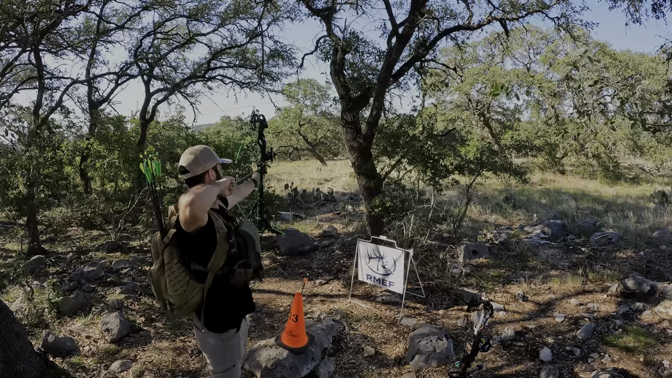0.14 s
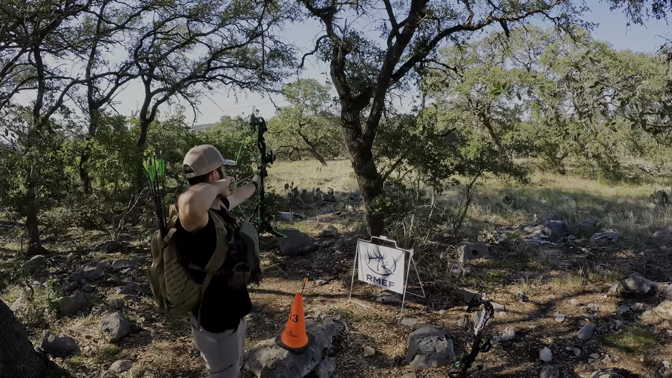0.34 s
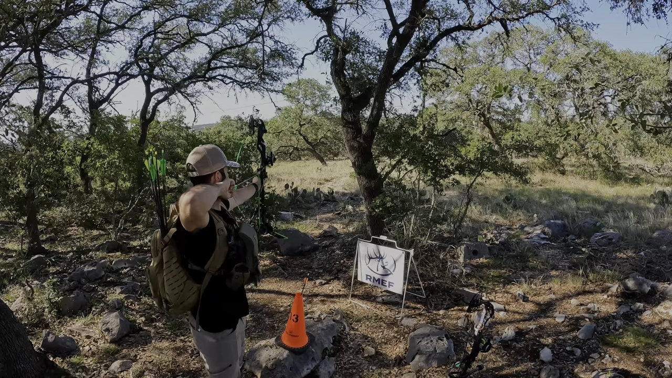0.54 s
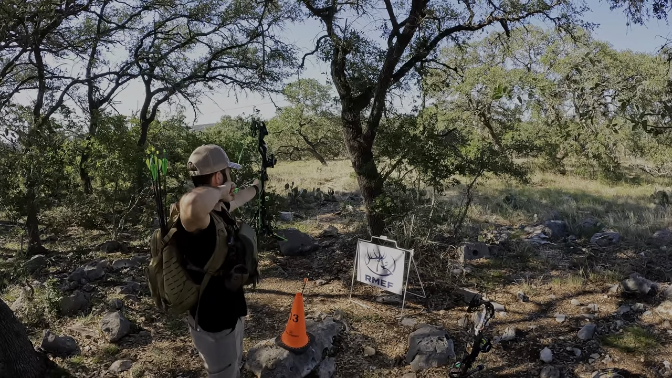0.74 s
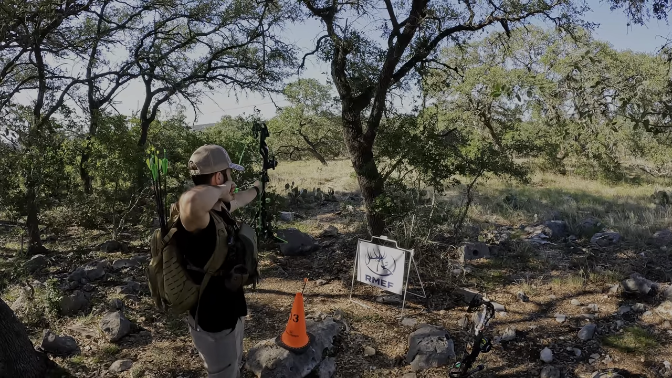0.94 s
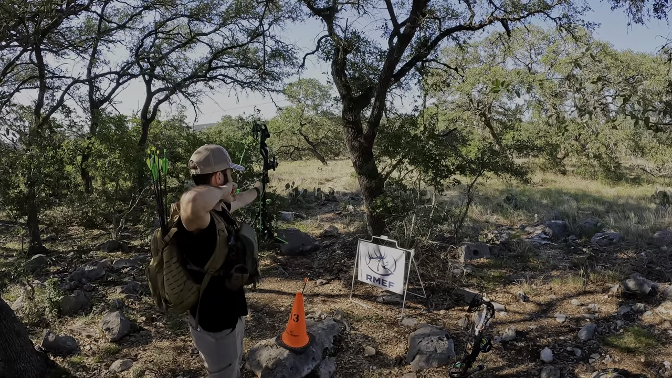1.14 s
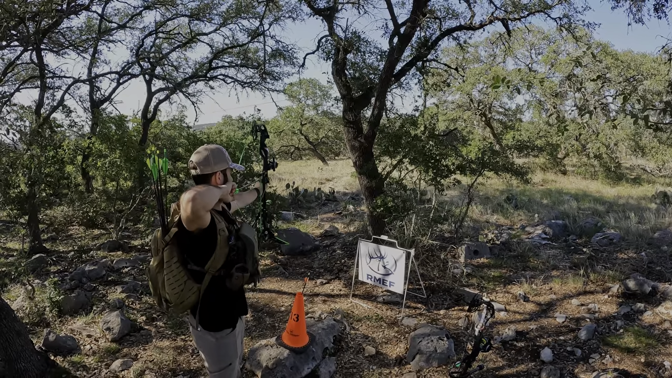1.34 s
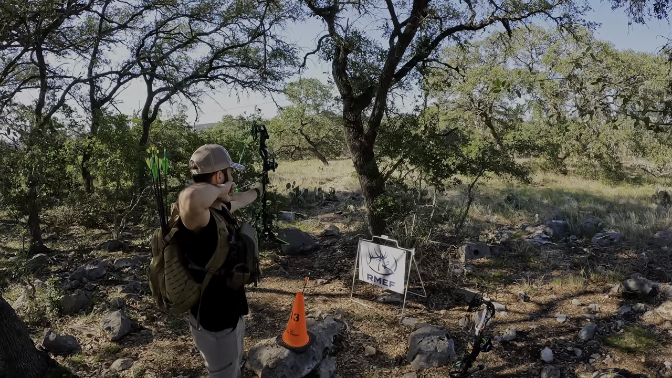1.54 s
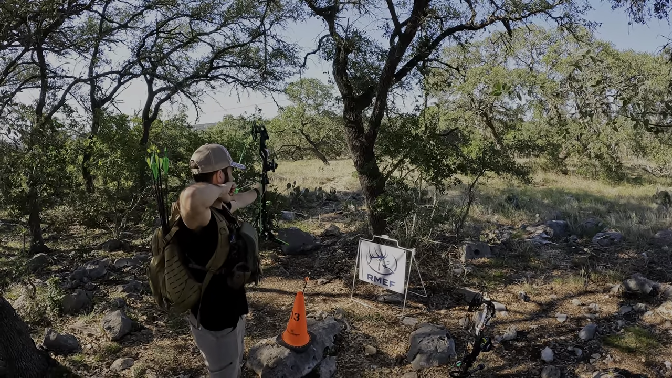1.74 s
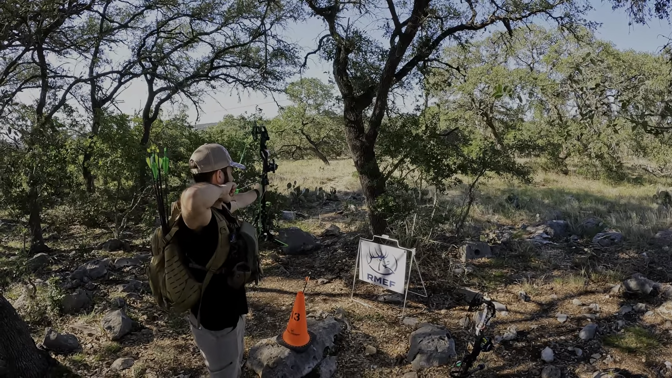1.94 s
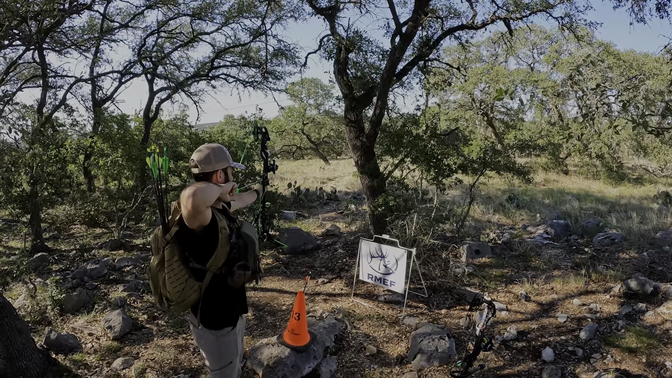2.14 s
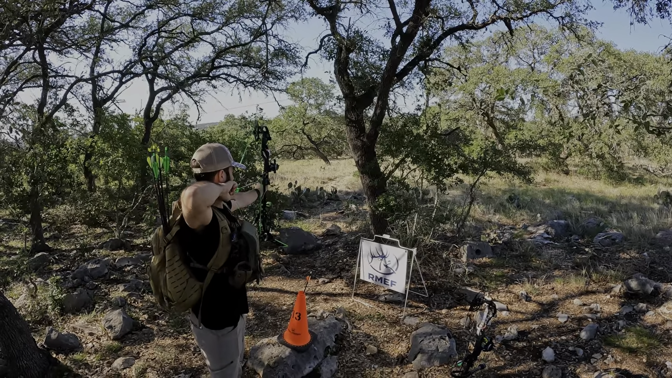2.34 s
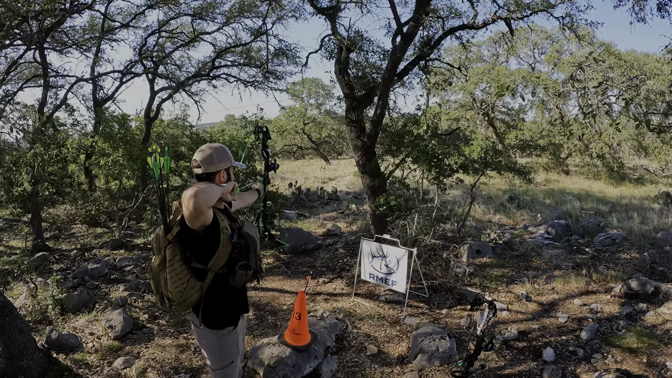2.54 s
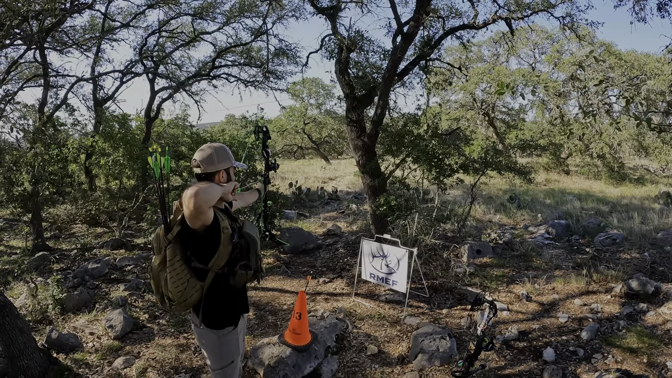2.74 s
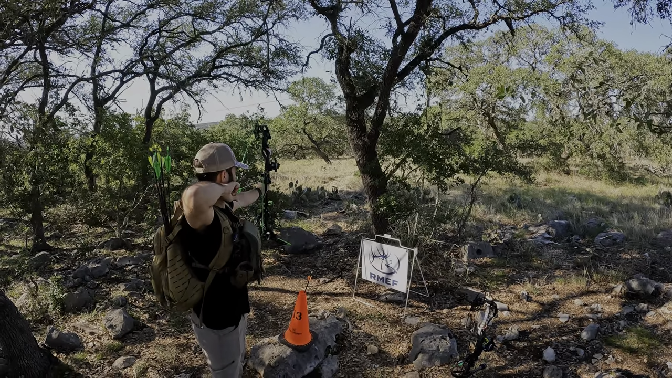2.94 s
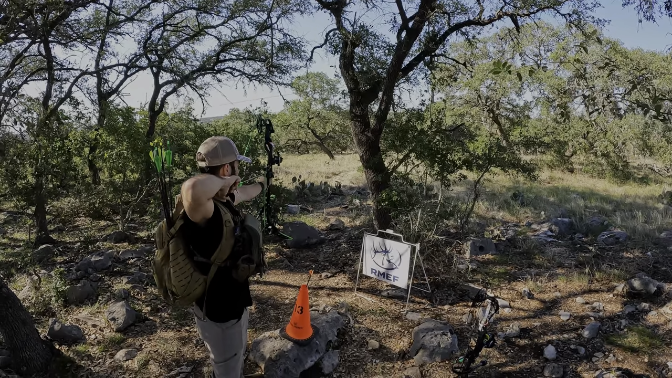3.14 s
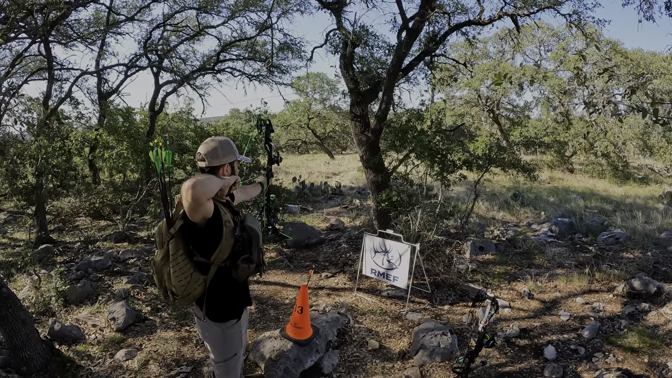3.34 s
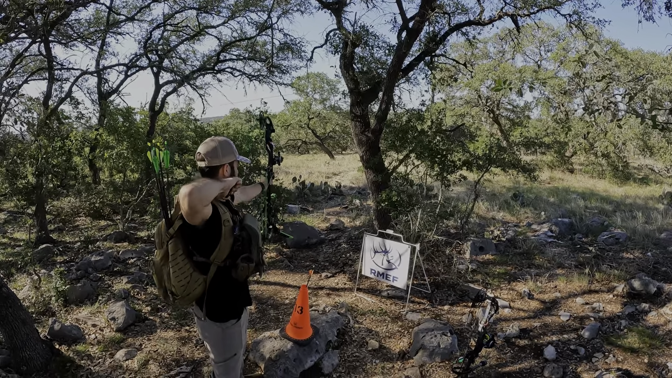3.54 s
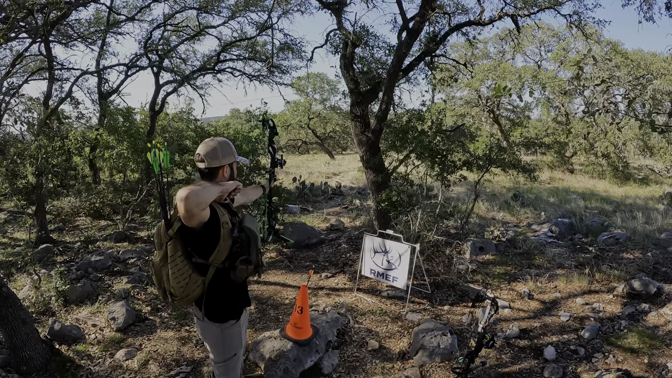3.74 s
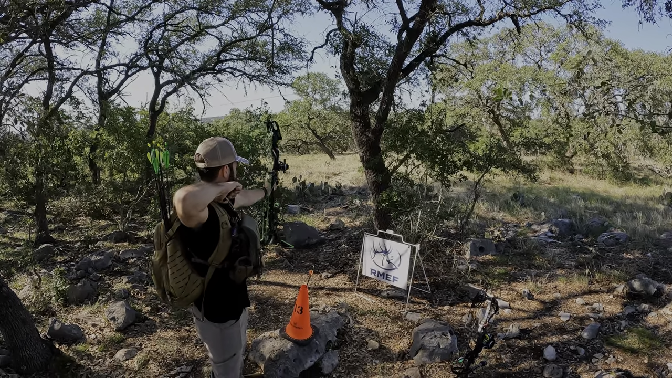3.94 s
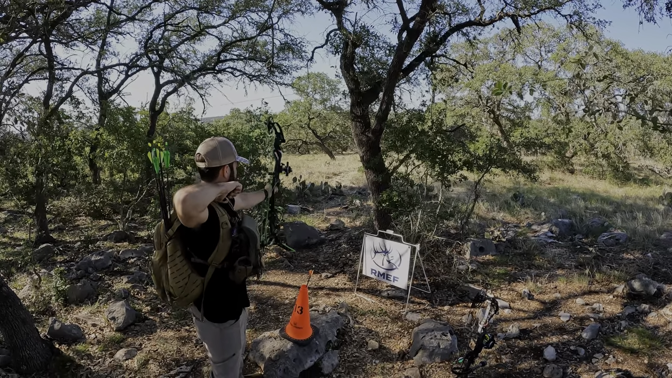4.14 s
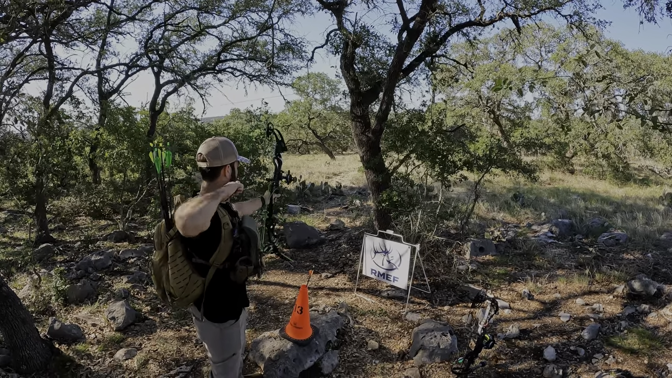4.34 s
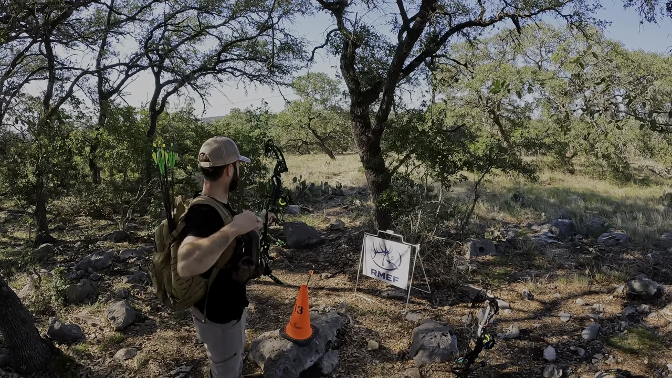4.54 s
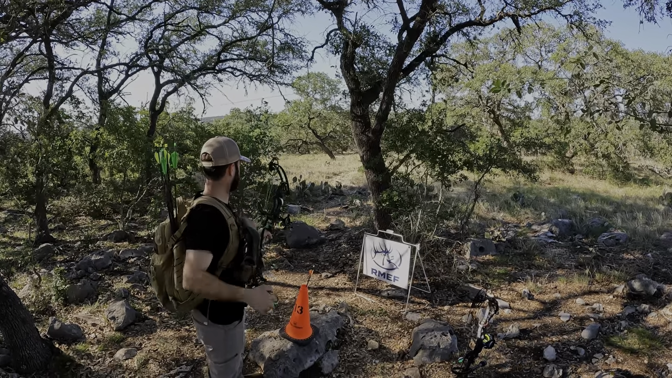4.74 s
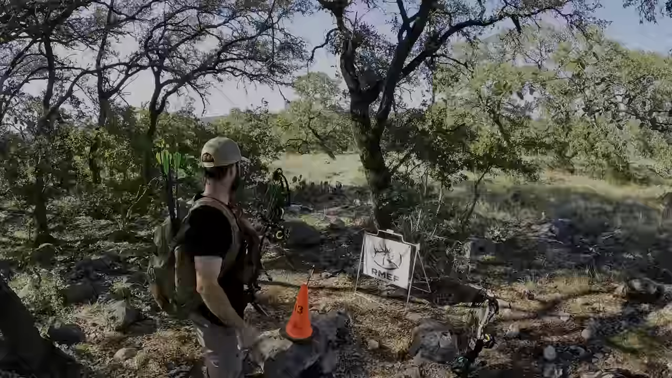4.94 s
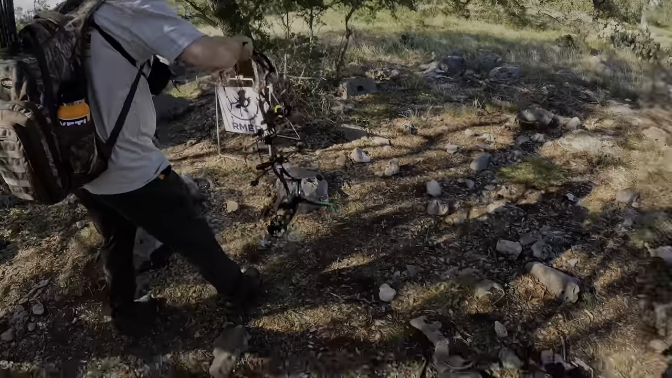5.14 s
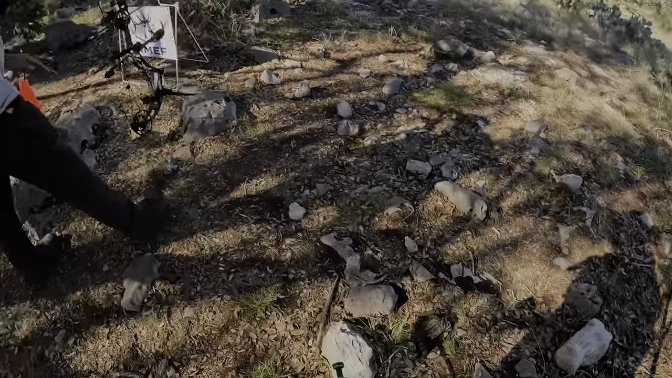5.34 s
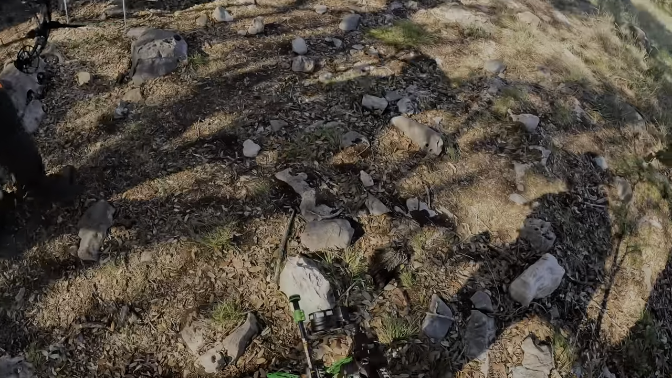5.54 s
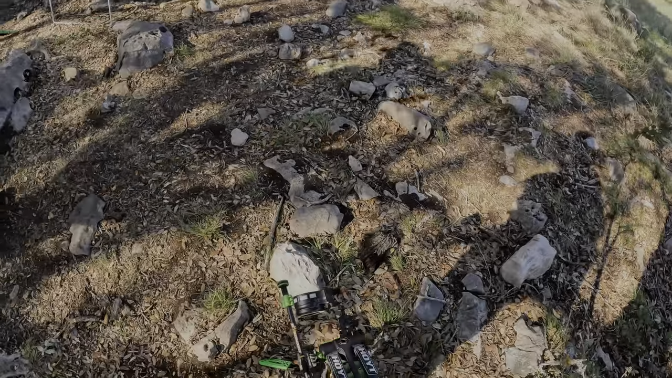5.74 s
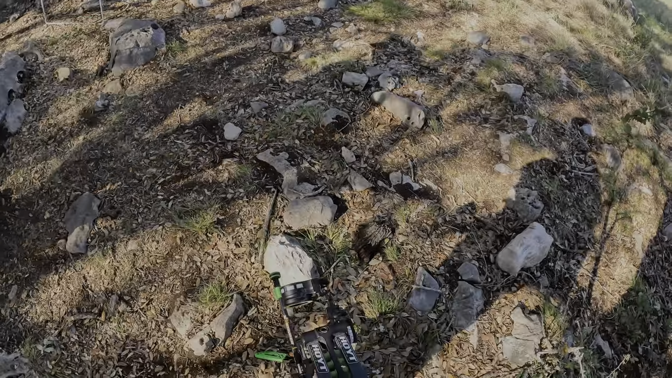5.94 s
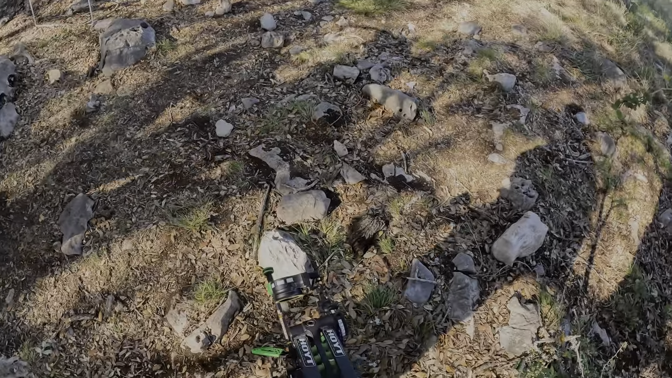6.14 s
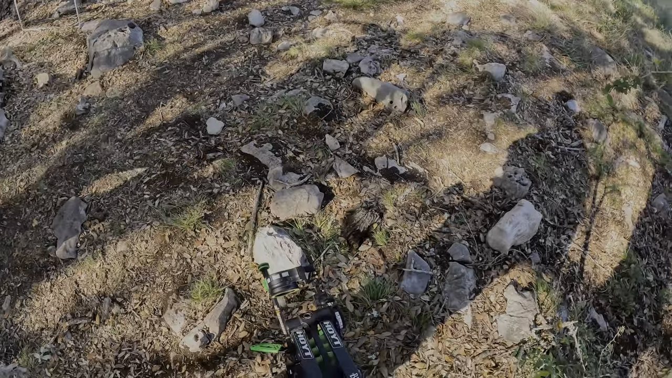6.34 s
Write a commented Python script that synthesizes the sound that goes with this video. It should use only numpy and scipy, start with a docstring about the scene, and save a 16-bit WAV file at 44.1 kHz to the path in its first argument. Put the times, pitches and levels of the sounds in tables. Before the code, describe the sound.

Outdoors among scattered trees, small birds chirp faintly over low wind rumble and thin leaf hiss. A bow close to the microphone suddenly releases: bright click, hard slam, brief metallic rattle and short woodland echo. About half a second later the arrow smacks dully into a foam target farther off. Wind buffets the microphone, then the scene cuts to a louder rush of air with cloth rustling, crunching litter and clearer birds.

```python
"""Birdsong over wind rumble and leaf hiss is heard first; at 3.57 s a bow is shot, as a click, a slam and a rattle.
The slam excites damped resonances of the bow; just over half a second later the arrow smacks into far foam.
Birds are tones of gliding pitch, and wind is filtered noise; scattered echoes trail the shot and the birds.
The sound opens from mono to stereo at 3 s. At 5.1 s the scene jumps to a second spot,
where a louder rush of air, made of noise, is joined by rustling cloth and random crunching snaps."""
import sys
import numpy as np
from scipy import signal
from scipy.fft import rfft, irfft, next_fast_len
from scipy.io import wavfile
from scipy.ndimage import uniform_filter1d, map_coordinates

SR = 44100
rng = np.random.default_rng(int(sys.argv[2]) if len(sys.argv) > 2 else 0)


def wav_out(sig):
    """Save sig, one row per channel (or a flat mono array), as 16-bit PCM at SR to the path in sys.argv[1]."""
    wavfile.write(sys.argv[1], SR, np.round(np.clip(np.atleast_2d(sig).T, -1, 1) * 32767).astype(np.int16))


N = 285324
TIME = np.arange(N) / SR

# Times of the string's slam, the arrow's impact, the jump to the second spot and the stereo opening
SHOT_S, HIT_S, JUMP_S, STEREO_S = 3.5748, 4.1503, 5.106, 3.0
TOP_HZ = 15900  # upper band limit

# Lurches of limbs and frame as the string stops and rebounds: [t/s, level/dB, f/Hz, t60/s]
BOW_LURCHES = [(3.5672, -20, 125, 0.048), (3.5765, -10.5, 177.7, 0.034), (3.606, -19, 95, 0.09),
               (3.6393, -19, 105, 0.035)]
# Resonances of the bow's body: [f/Hz, bandwidth/Hz, relative level/dB]
BOW_RESONANCES = [(207, 45, 2), (736, 31, -5), (1451, 31, 2.5), (1548, 35, -3), (2040, 28, -9),
                  (980, 260, -8), (4790, 150, -7)]
# Ringing thin metal parts of the bow: [f/Hz, level/dB, t60/s]
METAL_MODES = [(7300, -73.5, 2.6), (8140, -67.5, 1.1)]
# Clicks of the release and the gear: [t/s, level/dB, t60/s]
CLICK_EVENTS = [(0.057, -51.5, 0.04), (0.581, -57, 0.015), (3.554, -8, 0.0049), (3.5617, -15.5, 0.00715),
                (4.7544, -45.5, 0.0053), (5.036, -46, 0.01)]
# Dull knocks and scuffs: [t/s, level/dB, f/Hz]
KNOCK_EVENTS = [(1.373, -47, 730), (5.145, -31, 230), (5.175, -41, 2260), (5.271, -44, 595),
                (6.38, -43, 2010)]

# Noise spectra of the bow's slam and rattle, the clicks and the foam: [f/Hz, relative level/dB]
SLAM_SPECTRUM = [(60, -10.5), (170, 7.5), (380, -2), (3000, -6), (4500, -4), (7800, -11), (15000, -34.5)]
RATTLE_SPECTRUM = [(350, 1), (4700, -0.5), (7900, 2.5), (9000, -8.5), (15500, -27.5)]
CLICK_SPECTRUM = [(900, -25), (3100, -15), (5000, 0.5), (6300, -5), (7900, -2.5), (9500, -14.5),
                  (15000, -36)]
FOAM_SPECTRUM = [(700, -9), (1850, 1.5), (3500, -14), (5200, 0), (7000, 3.5), (8200, -14.5), (15000, -42)]
# Noise spectra of the second spot's air and cloth: [f/Hz, relative level/dB]
RUSH_SPECTRUM = [(330, -2.5), (550, -7.5), (1320, -10.5), (1900, -17), (4500, -19), (8000, -33),
                 (15000, -62)]
RUSTLE_SPECTRUM = [(800, -8), (2500, 1), (7000, -5.5), (9000, -15), (12000, -17), (15000, -32)]
# Noise spectra of microphone wind, far trees, leaves and canopy: [f/Hz, relative level/dB]
RUMBLE_SPECTRUM = [(25, 0), (60, -0.5), (100, -12.5), (200, -23.5), (1500, -100)]
MURMUR_SPECTRUM = [(220, -0.5), (350, -4), (600, -12.5), (900, -18), (12000, -81.5)]
LEAF_SPECTRUM = [(1500, -8.5), (5000, -1), (8500, -18), (15000, -30)]
CANOPY_SPECTRUM = [(400, 1), (850, -8), (1300, -0.5), (2200, -16.5), (12000, -55)]

# Air and cloth at the second spot: [t/s, rush level/dB, rustle level/dB]
SECOND_SPOT_LEVELS = [(5.17, -50.5, -53), (5.3, -51, -60.5), (5.49, -49, -55), (5.66, -47, -59),
                      (5.88, -53.5, -63), (6.24, -50.5, -57), (6.42, -56, -50.5)]
# Wind on the microphone: [t/s, rumble level/dB]
WIND_LEVELS = [(0, -41), (2.2, -39.5), (4.9, -36)]
# Gusts on the microphone ports: [t/s, standard deviation/s, level/dB]
GUST_EVENTS = [(3.274, 0.078, -27), (3.864, 0.029, -26), (4.232, 0.0082, -21), (4.264, 0.055, -28),
               (4.407, 0.046, -20.5), (4.629, 0.019, -28)]
# Far air in the trees: [t/s, murmur level/dB, leaf hiss level/dB]
AIR_LEVELS = [(0, -57, -69.5), (1.2, -59, -85.5), (2.9, -58.5, -82), (3.1, -60.5, -79.5), (5.1, -68, -71)]

# Falling notes: [t/s, length/s, starting f/Hz, level/dB]
FALLING_NOTES = [(1.782, 0.085, 5520, -73.5), (1.929, 0.06, 5080, -72), (2.143, 0.033, 3990, -67.5),
                 (2.174, 0.033, 4310, -62.5), (2.5, 0.031, 3830, -64), (2.592, 0.049, 4544, -56),
                 (2.791, 0.029, 4460, -59.5), (2.826, 0.031, 4913, -57.5), (3.016, 0.055, 4616, -58.5),
                 (3.132, 0.032, 5060, -61), (3.152, 0.025, 4950, -59), (5.223, 0.035, 6430, -57.5),
                 (5.753, 0.021, 3630, -49.5), (5.838, 0.048, 3980, -52), (6.023, 0.0346, 3560, -52.5)]
# Rising notes: [t/s, length/s, starting f/Hz, level/dB]
RISING_NOTES = [(2.537, 0.065, 3360, -62), (3.185, 0.021, 4313, -64), (5.799, 0.026, 2750, -47.5),
                (6.132, 0.031, 4300, -57)]
# Held notes: [t/s, length/s, f/Hz, level/dB]
HELD_NOTES = [(2.015, 0.049, 5256, -63.5), (2.221, 0.032, 3260, -63.5), (2.402, 0.043, 4270, -59),
              (2.924, 0.0614, 3450, -62), (4.575, 0.081, 5160, -57.5), (5.708, .025, 4400, -52),
              (5.937, 0.038, 2930, -54), (6.207, 0.032, 3642, -52), (6.268, 0.063, 3685, -52),
              (6.385, 0.056, 3580, -54)]
# Buzzy notes: [t/s, length/s, start f/Hz, end f/Hz, level/dB, swell/dB, warble depth/Hz]
BUZZY_NOTES = [(2.313, 0.088, 5030, 4590, -67.5, 10, 380), (2.698, 0.072, 5500, 5750, -69.5, -9, 350),
               (4.812, 0.292, 4760, 5050, -58, 12.5, 151), (5.483, 0.19, 3657, 2860, -53.5, -4, 220)]
# Faint far hums: [t/s, length/s, f/Hz, level/dB]
HUM_EVENTS = [(1.734, 1.24, 635, -71.5), (1.78, 1.3, 486, -68.5), (5.957, 0.62, 234, -56)]

# Stereo balance of the bow and target: [f/Hz, left-minus-right level/dB]
RANGE_BALANCE = [(2400, 0.5), (6000, 4.5)]
# Stereo balance of sounds from ahead and to the left: [f/Hz, left-minus-right level/dB]
LEFT_BALANCE = [(150, -7.5), (1290, 3.5), (8100, 4.5)]
# Decay of scatter from trunks and crowns, before stretching: [f/Hz, t60/s]
WOOD_DECAY = [(1300, 0.88), (7000, 0.84), (12000, 0.14)]

RIGHT_LEAD_RAD = 0.5  # phase lead of the right port above the bass
CLOTH_ROUGH_DB, CRUNCH_DB, PATCHY_DB = 3, -4.5, 1.8
FLUTTER_DB, WAVER_SHARE = 2.2, .003  # random level and pitch variation of a note
FALL_SHARE, RISE_SHARE, ARCH_SHARE = .24, 0.4, 0.045  # shares of the note's pitch
HOOK_S = .042  # sets how short a note must be to dwell on its starting pitch
HUM_WIDTH = 0.044  # half width as a share of the pitch

# A bird that alternates a level whistle with a high upward flick
SEESAW_S, SEESAW_PERIOD_S = 0.1, 0.246
SEESAW_HZ, SEESAW_DB, FLICK_HZ, FLICK_DB = 4026, -67, 7050, -77.5
# A farther bird that alternates a low falling chirp with a higher note
FAR_S, FAR_PERIOD_S = .385, .338
FAR_LOW_HZ, FAR_LOW_DB, FAR_HIGH_HZ, FAR_HIGH_DB = 2210, -72, 3210, -77.5
# Birdsong that lingers among the trees at the second spot
LINGER_S, LINGER_LENGTH_S, LINGER_HZ, LINGER_DB = 5.27, 1.31, 3580, -64


def bow():
    """Impact excitation and modal resonance: string slam, uneven slaps on its stop, clattering fittings."""
    slide = amp(-26) * blow(SHOT_S - .016, rise=0.0098, t60=0.27) * noise(SLAM_SPECTRUM, side_db=-8)
    slam = amp(-13) * blow(SHOT_S, rise=0.0012, t60=0.057) * noise(SLAM_SPECTRUM, side_db=-13.5)

    slap_rate = 138 * amp(2 * wobble(138))  # Hz
    slap_phase = np.cumsum(slap_rate) / SR % 1
    slaps = unit(amp(-11 * slap_phase + 2.4 * wobble(400)))
    rattle_envelope = amp(-11.5) * blow(SHOT_S + 0.012, rise=0.019, t60=0.1)
    rattle = rattle_envelope * slaps * noise(RATTLE_SPECTRUM, side_db=-7)
    clatter = amp(-31.0) * blow(SHOT_S + 0.049, rise=0.0033, t60=0.1) * slaps * puff(1050)

    knock = amp(4.5) * filtered(slam + rattle, body_response)
    limbs = sum(amp(db) * ring(s, hz, 0.00098, t60) for s, db, hz, t60 in BOW_LURCHES)
    metal = sum(amp(db) * ring(SHOT_S, hz, .002, t60) for hz, db, t60 in METAL_MODES)
    metal = metal * amp(3.5 * wobble(40))
    return slide + slam + rattle + clatter + knock + limbs + metal


def body_response(f):
    """Modal superposition: the bow's body as a sum of damped second-order resonances."""
    return sum(amp(db) * 1j * f * width / (centre ** 2 - f * f + 1j * f * width)
               for centre, width, db in BOW_RESONANCES)


def clicks():
    """Brief impact of small hard parts: a steep onset and fast decay shape bright noise."""
    strikes = sum(amp(db) * blow(s, 0.00045, t60) for s, db, t60 in CLICK_EVENTS)
    return strikes * noise(CLICK_SPECTRUM, side_db=-14.5)


def target():
    """Impact and diffuse reflection: foam smack, block thud, and a duller return from brush and trunks."""
    smack = amp(-23.5) * blow(HIT_S, rise=0.00027, t60=0.0092) * noise(FOAM_SPECTRUM, side_db=-8)
    thud = amp(-17.5) * ring(HIT_S + 0.0043, hz=114.0, rise=0.00086, t60=0.053)

    returns = amp(-44.5) * blow(HIT_S, rise=0.0032, t60=0.27)
    returns = returns + amp(-40) * blow(HIT_S + 0.0235, rise=.0005, t60=0.014)
    dulling = lambda hz: amp(6.5) / np.hypot(1, (hz / 2800) ** 2)
    brush = filtered(returns * noise(FOAM_SPECTRUM), dulling)
    far = amp(-55) * blow(HIT_S + 0.012, rise=0.013, t60=0.96) * puff(1270)
    trunks = unit(amp(3 * wobble(140)))  # uneven level of the returns
    return smack + thud + trunks * (brush + far)


def knocks():
    """Soft contact: each meeting of surfaces is a short gritty puff of noise about one pitch."""
    grit = unit(amp(3 * wobble(450)))
    return grit * sum(amp(db) * blow(s, 0.0018, 0.065) * puff(hz) for s, db, hz in KNOCK_EVENTS)


def second_spot():
    """Turbulence, friction and random impulses: rushing air, cloth and crunching litter; birdsong lingers."""
    rush_db, rustle_db = curves(SECOND_SPOT_LEVELS)
    stir = wobble(35)  # shared by air, cloth and litter
    rush = amp(rush_db + 0.3 * stir) * patchy(noise(RUSH_SPECTRUM), PATCHY_DB)

    roughness = unit(amp(CLOTH_ROUGH_DB * wobble(600) + stir))
    cloth = amp(rustle_db) * roughness * patchy(noise(RUSTLE_SPECTRUM), PATCHY_DB)

    snap_happens = rng.random(N) < 220 * amp(6 * stir) / SR  # clumps where the stir is strong
    snaps = snap_happens * rng.standard_normal(N) * rng.uniform(.5, 1, (2, N))
    litter = unit(filtered(snaps, lambda hz: amp(along(RUSH_SPECTRUM, hz))))
    crunch = amp(rush_db + CRUNCH_DB) * litter

    linger = hum(LINGER_S, LINGER_LENGTH_S, LINGER_HZ, LINGER_DB)
    return (rush + crunch + cloth) * (TIME > JUMP_S) + linger


def birds():
    """Multiple scattering: near trunks blur the calls, and the farther pair send more into the long tail."""
    far = np.array([repeaters()] * 2)
    song = warblers() + buzzes() + far
    blur = amp(-6.5) * scatter(song, stretch=.25)
    tail = amp(-12) * scatter(song + far, stretch=1)
    return song + blur + tail


def warblers():
    """Frequency glides: quick songs strung from falling, rising and held notes."""
    falls = sum(slur(*row, -FALL_SHARE) for row in FALLING_NOTES)
    rises = sum(slur(*row, RISE_SHARE) for row in RISING_NOTES)
    return falls + rises + sum(arch(*row) for row in HELD_NOTES)


def buzzes():
    """Frequency modulation: a fast warble of pitch is heard as a buzz."""
    song = np.zeros(N + SR)
    for s, length, start, end, db, swell_db, warble_hz in BUZZY_NOTES:
        u = np.linspace(0, 1, int(length * SR))
        warble = np.sin(2 * np.pi * 140 * length * u + .7 * wobble(90)[:len(u)])  # about 140 Hz
        pitch = start + (end - start) * u + warble_hz * warble
        fade = signal.windows.tukey(len(u), min(1, .04 / length))
        level = amp(db + swell_db * (u - .5) + wobble(170)[:len(u)]) * fade
        song[int(s * SR):][:len(u)] += level * np.sin(2 * np.pi * np.cumsum(pitch) / SR)
    return song[:N]


def repeaters(count=3):
    """Periodic repetition: two birds each pace a two-note phrase; the high flick starts with a burr."""
    song = np.zeros(N)
    burr = lambda u: 1 + 0.22 * np.sin(2 * np.pi * 20 * u)
    whistle = lambda u: SEESAW_HZ * (1 - 0.078 * np.exp(-u / 0.096))
    for k in range(count):
        s = SEESAW_S + k * SEESAW_PERIOD_S
        song += note(s, length=0.107, db=SEESAW_DB, pitch=whistle)
        top = FLICK_HZ * (1 - 0.0152 * k)  # each flick is a little lower
        flick = lambda u: top * (1 - 0.24 * burr(u) * np.exp(-(u / 0.46) ** 4))
        song += note(s + .11, length=0.078, db=FLICK_DB, pitch=flick)

        s = FAR_S + k * FAR_PERIOD_S
        song += slur(s, length=0.0384, hz=FAR_LOW_HZ, db=FAR_LOW_DB, bend=-0.13)
        song += slur(s + 0.094, length=0.045, hz=FAR_HIGH_HZ, db=FAR_HIGH_DB, bend=0.084)
    return song


def slur(s, length, hz, db, bend):
    """Decelerating glide: pitch leaves hz by the share bend and levels off; short notes start with a hook."""
    hook = max(.75, (HOOK_S / length) ** 2)
    return note(s, length, db, lambda u: hz * (1 + bend * np.sin(np.pi / 2 * u ** hook)))


def arch(s, length, hz, db):
    """Parabolic pitch contour: a held note scoops up to hz and sags at the end."""
    return note(s, length, db, lambda u: hz * (1 - ARCH_SHARE * (2 * u - 1) ** 2))


def note(s, length, db, pitch):
    """Phase integration of a fluttering tone; pitch gives Hz as the note's progress runs from 0 to 1."""
    u = np.linspace(0, 1, int(length * SR))
    flutter, waver = (map_coordinates(rng.standard_normal(len(u)), [u * length * 170]) for _ in range(2))
    phase = 2 * np.pi * np.cumsum(pitch(u) * (1 + WAVER_SHARE * waver)) / SR
    envelope = amp(db + FLUTTER_DB * flutter) * np.abs(np.sin(np.pi * u)) ** 0.39
    return np.pad(envelope * np.sin(phase), (int(s * SR), N))[:N]


def hum(s, length, hz, db):
    """Narrow-band noise: a resonant filter leaves a fuzzy line that fades in and out."""
    window = np.pad(signal.windows.tukey(int(length * SR), .2), (int(s * SR), N))[:N]
    line = filtered(rng.standard_normal(N), lambda f: 1 / (1 + ((f / hz - 1) / HUM_WIDTH) ** 2))
    return amp(db) * window * unit(line)


def wind():
    """Turbulent pressure: lumpy rumble and gusts from the right, over the murmur and hiss of far trees."""
    rumble_db, = curves(WIND_LEVELS)
    murmur_db, hiss_db = curves(AIR_LEVELS)
    rumble = amp(rumble_db + 2.1 * wobble(14)) * noise(RUMBLE_SPECTRUM, side_db=-14.5)

    push = sum(amp(db) * bump(s, width) for s, width, db in GUST_EVENTS)
    gusts = push * noise(RUMBLE_SPECTRUM, side_db=-14.0)
    buffet = filtered(gusts, lambda hz: 1 / np.hypot(1, (hz / 170) ** 2))
    buffet = buffet * amp([[-3.5], [2]])  # left and right levels in dB

    murmur = amp(murmur_db + 1.6 * wobble(3.3)) * noise(MURMUR_SPECTRUM)
    swell = amp(-48) * bump(1.5, 0.24) * puff(137)  # a low, distant swell
    canopy = amp(-66 + 1.8 * wobble(5.864)) * noise(CANOPY_SPECTRUM)
    hiss = amp(hiss_db + wobble(1.9)) * noise(LEAF_SPECTRUM)
    return rumble + buffet + murmur + swell + canopy + hiss


def scatter(x, stretch):
    """Diffuse reverberation: convolution with decaying noise; stretch scales the wood's decay time."""
    hz, t, z = signal.stft(rng.standard_normal((2, SR)), SR, nperseg=256)
    decay = amp(-60 * t / (stretch * along(WOOD_DECAY, hz)[:, None]))
    tail = signal.istft(z * decay, SR, nperseg=256)[1]
    tail = tail + 2.0 * tail[::-1]  # the two ports are close and hear much the same
    return signal.fftconvolve(x, tail / np.linalg.norm(tail[0]), axes=1)[:, :N]


def placed(x, balance, lead=0):
    """Interaural level and phase: balance gives L-R dB; above the bass the right leads by lead radians."""
    half = np.array([[.5], [-.5]])

    def response(hz):
        phase = half * lead * hz ** 2 / (hz ** 2 + 800 ** 2)
        return amp(half * along(balance, hz)) * np.exp(-1j * phase)

    return filtered(x, response)


def blow(s, rise, t60):
    """Damped impact: exponential rise (s) and 60 dB decay time t60 (s) from time s."""
    t = np.maximum(TIME - s, 0)
    return (1 - np.exp(-t / rise)) * np.exp(-np.minimum(np.log(1000) * t / t60, 50))


def ring(s, hz, rise, t60):
    """Free vibration: one struck mode as a damped sine."""
    return blow(s, rise, t60) * np.sin(2 * np.pi * hz * (TIME - s))


def bump(s, width):
    """Gaussian envelope of peak 1 at time s, with standard deviation width in seconds."""
    return np.exp(-.5 * ((TIME - s) / width) ** 2)


def noise(spectrum, side_db=-4.5):
    """Spectral shaping: coloured noise of rms 1, with mid and side parts setting the stereo width."""
    mid, side = filtered(rng.standard_normal((2, N)), lambda hz: amp(along(spectrum, hz)))
    side = amp(side_db) * side
    return unit(np.array([mid + side, mid - side]))


def puff(hz):
    """Band-limited noise: a dull sound centred on one pitch."""
    return noise([(hz / 4, -15), (hz, 0), (hz * 2, -11), (hz * 10, -70)])


def patchy(x, depth_db):
    """Time-frequency modulation: bands of a noise swell and sink on their own."""
    z = signal.stft(x, nperseg=512)[2]
    field = uniform_filter1d(rng.standard_normal(z.shape[1:]), size=12, axis=0)  # over frequency
    field = uniform_filter1d(field, size=7, axis=1)  # over time
    return unit(signal.istft(z * amp(depth_db * unit(field)), nperseg=512)[1][:, :N])


def wobble(rate):
    """Interpolated random process: a smooth curve with rate knots a second."""
    return map_coordinates(rng.standard_normal(int(N * rate / SR) + 4), [TIME * rate])


def filtered(x, response):
    """Linear filtering: the spectrum of x times a complex response of frequency."""
    m = next_fast_len(N + SR // 2)
    return irfft(rfft(x, m) * response(np.fft.rfftfreq(m, 1 / SR)), m)[..., :N]


def curves(rows):
    """Linear interpolation in time: one value per sample for each column after the time."""
    s, *cols = np.transpose(rows)
    return [np.interp(TIME, s, c) for c in cols]


def along(points, hz):
    """Logarithmic frequency scale: (Hz, value) points interpolated on a log axis."""
    f, v = np.transpose(points)
    return np.interp(np.log(hz + 1), np.log(f + 1), v)


def amp(db):
    """Level law: decibels to amplitude gain."""
    return 10 ** (np.asarray(db) / 20)


def unit(x):
    """Energy normalisation: scale to rms 1."""
    return x / np.sqrt(np.mean(x ** 2) + 1e-20)


def scene():
    """Superposition: the shot and its ground and tree echoes, amid birds, wind and far hums."""
    shot = bow() + clicks()
    echoes = amp(-11.5) * scatter(shot, stretch=0.2) + amp(-27.0) * scatter(shot, stretch=0.94)
    archery = placed(shot + echoes + target(), RANGE_BALANCE, RIGHT_LEAD_RAD)
    surroundings = placed(birds() + second_spot(), LEFT_BALANCE)
    hums = sum(hum(*row) for row in HUM_EVENTS)
    return archery + surroundings + knocks() + wind() + hums


def record(dry):
    """Channel summation and band limiting: mono until STEREO_S, then stereo, with a steep cut at TOP_HZ."""
    ports = np.where(TIME < STEREO_S, dry.mean(axis=0), dry)
    return filtered(ports, lambda hz: 1 / (1 + (hz / TOP_HZ) ** 120))


dry = scene()
out = record(dry)
wav_out(out)
```